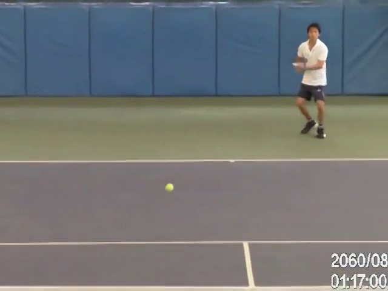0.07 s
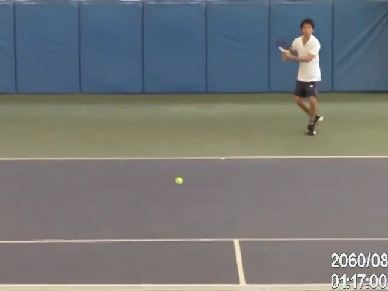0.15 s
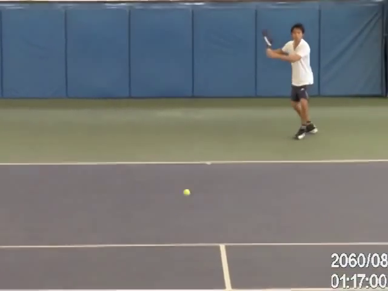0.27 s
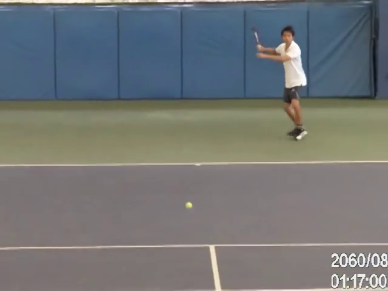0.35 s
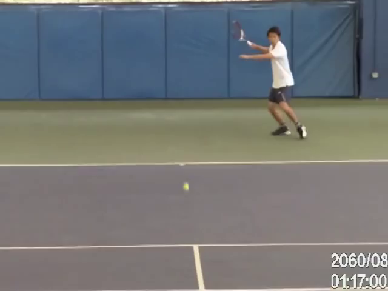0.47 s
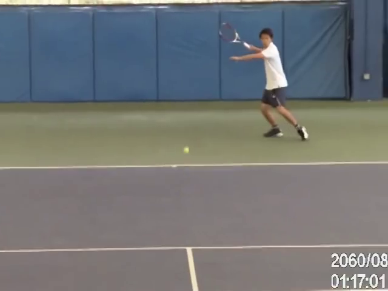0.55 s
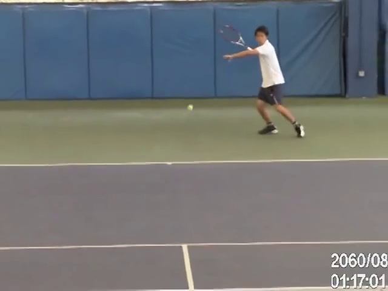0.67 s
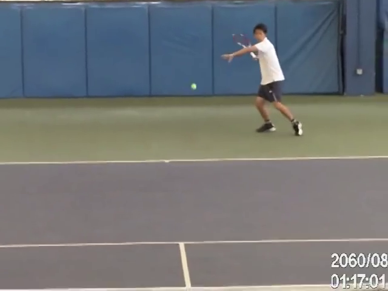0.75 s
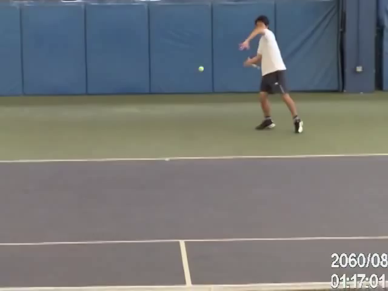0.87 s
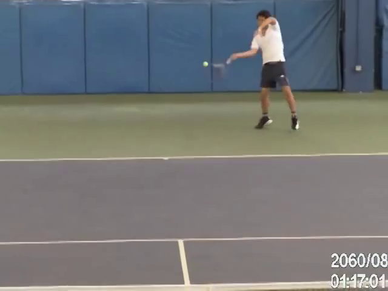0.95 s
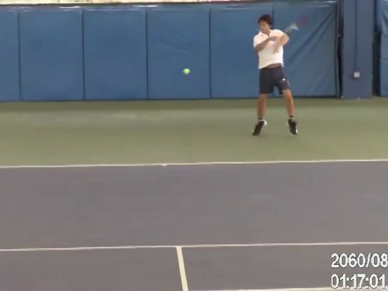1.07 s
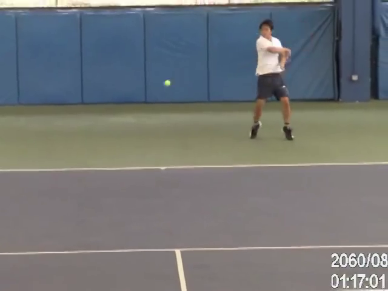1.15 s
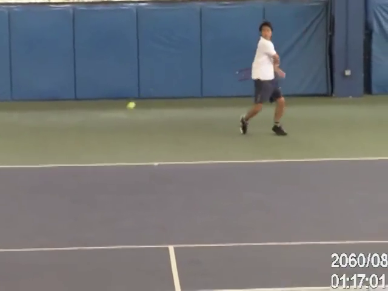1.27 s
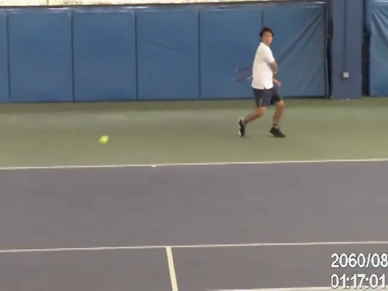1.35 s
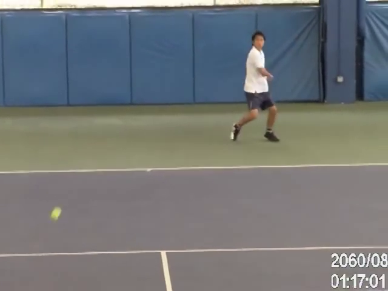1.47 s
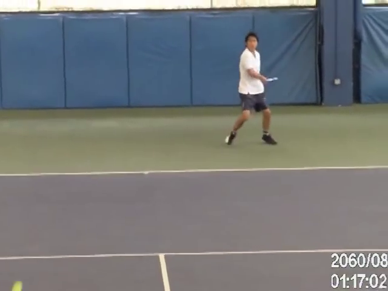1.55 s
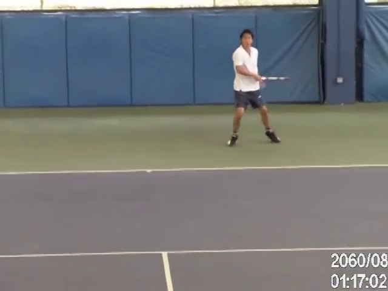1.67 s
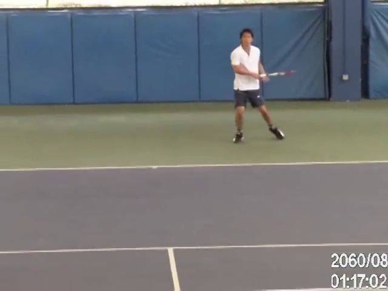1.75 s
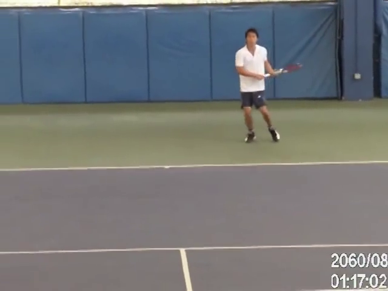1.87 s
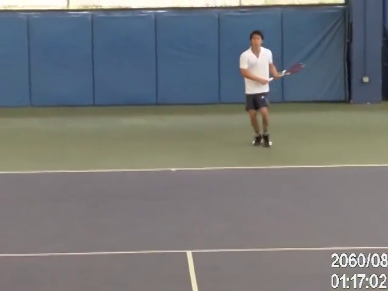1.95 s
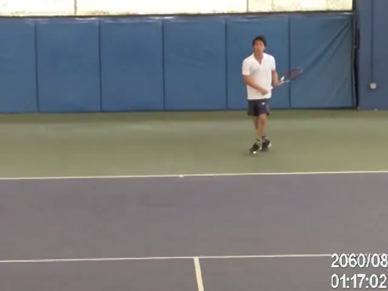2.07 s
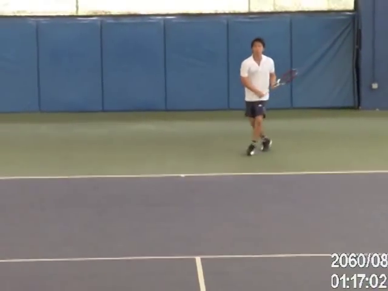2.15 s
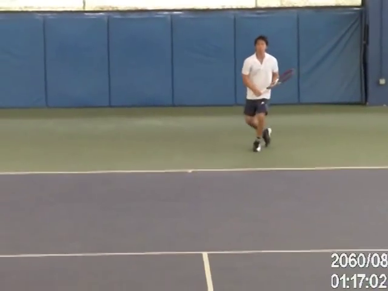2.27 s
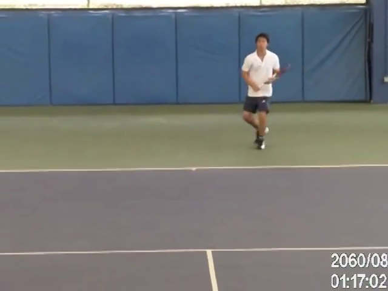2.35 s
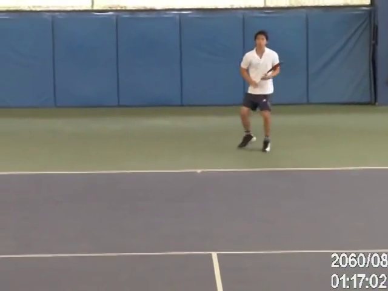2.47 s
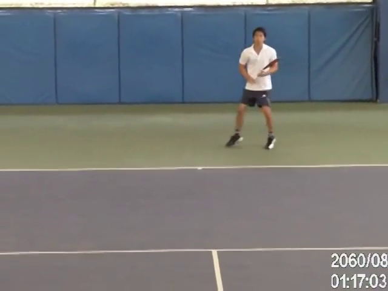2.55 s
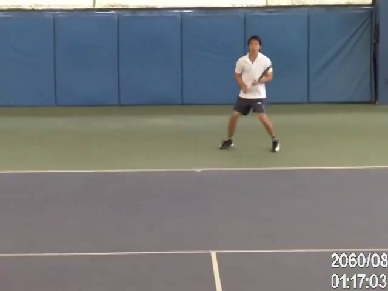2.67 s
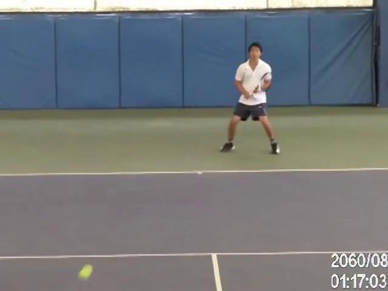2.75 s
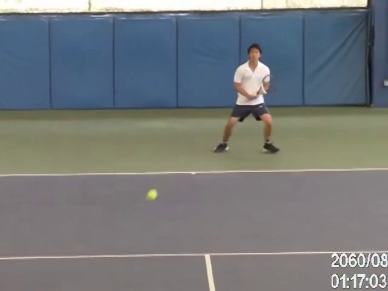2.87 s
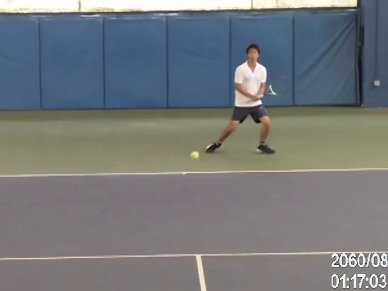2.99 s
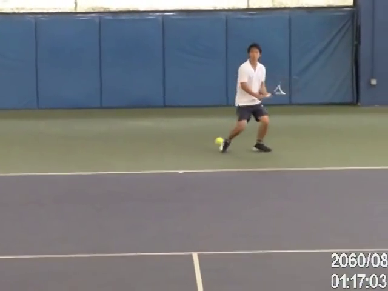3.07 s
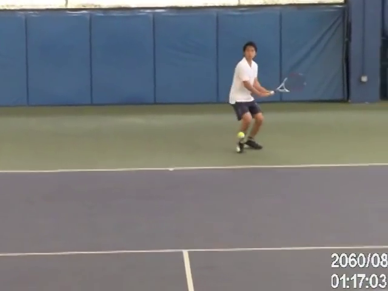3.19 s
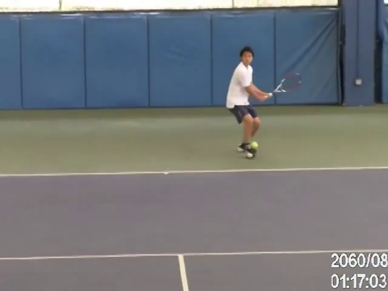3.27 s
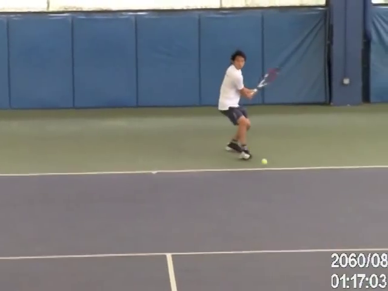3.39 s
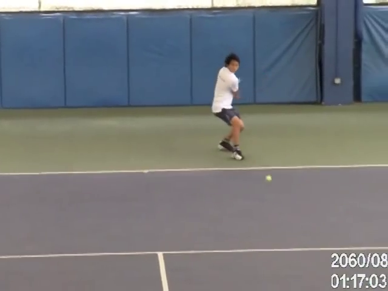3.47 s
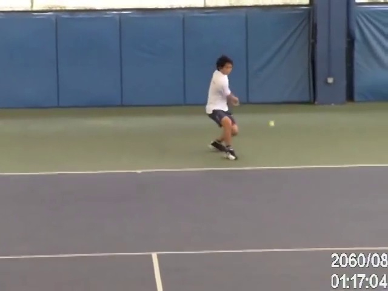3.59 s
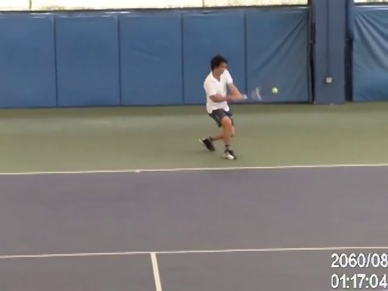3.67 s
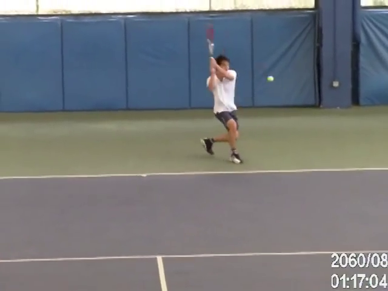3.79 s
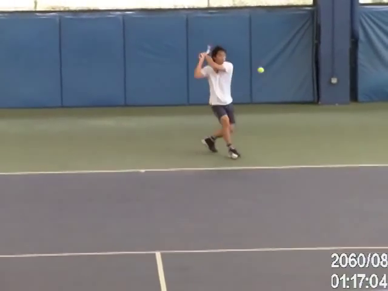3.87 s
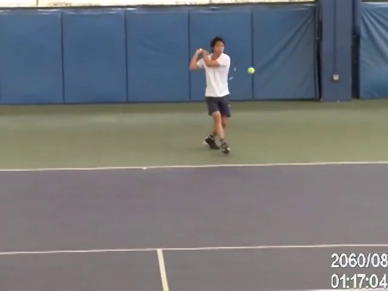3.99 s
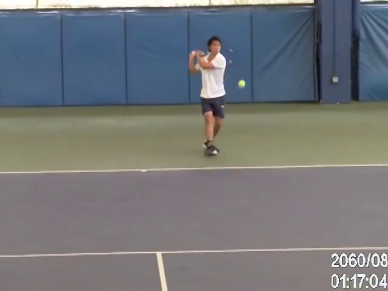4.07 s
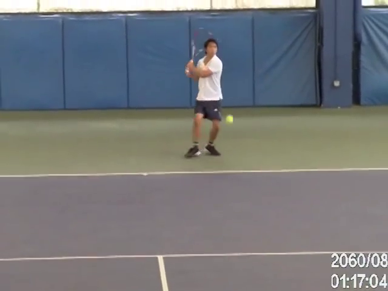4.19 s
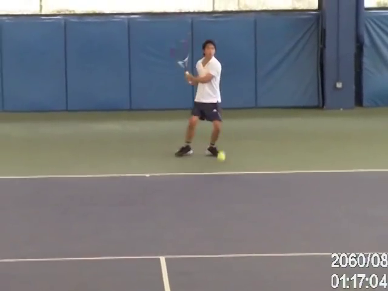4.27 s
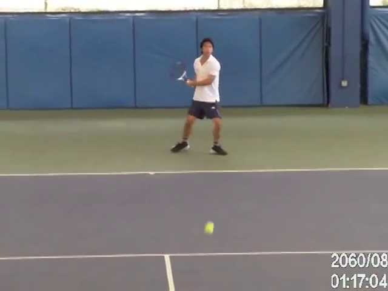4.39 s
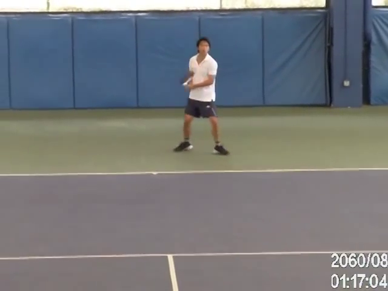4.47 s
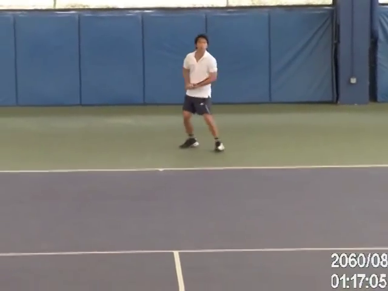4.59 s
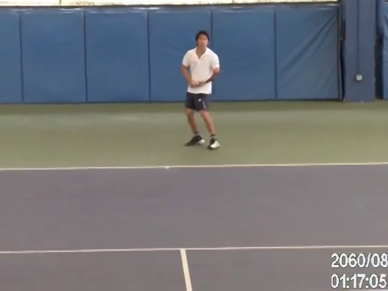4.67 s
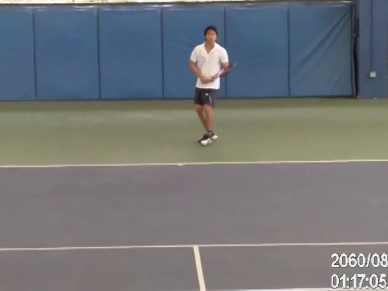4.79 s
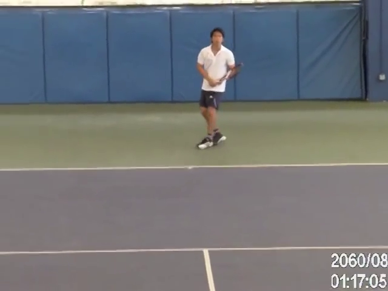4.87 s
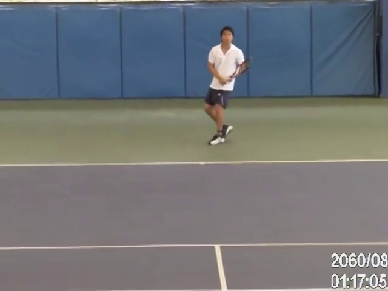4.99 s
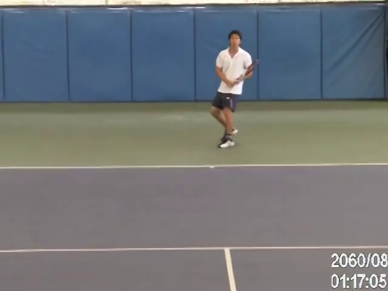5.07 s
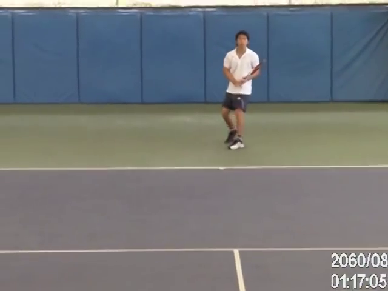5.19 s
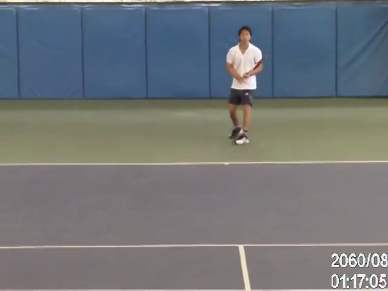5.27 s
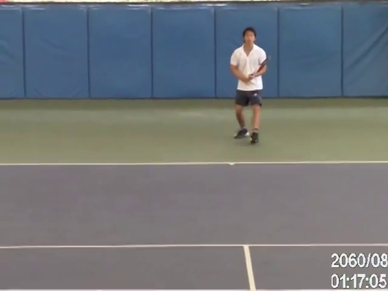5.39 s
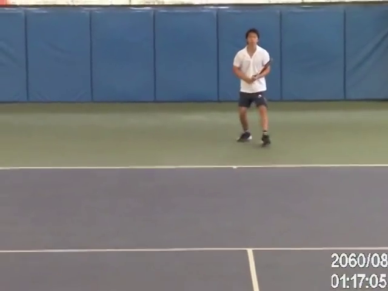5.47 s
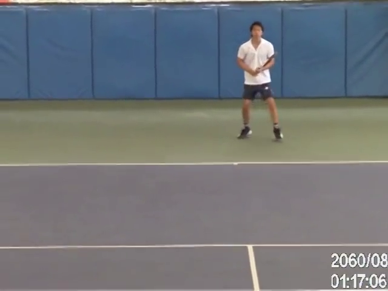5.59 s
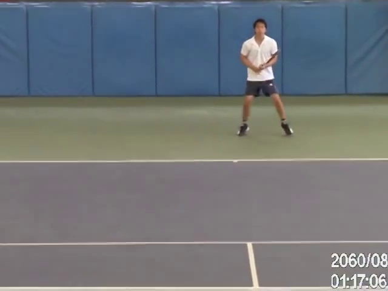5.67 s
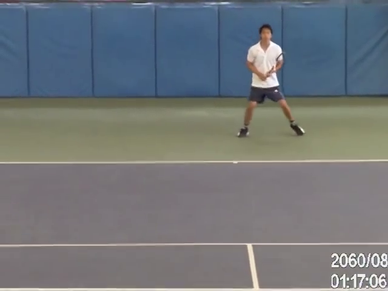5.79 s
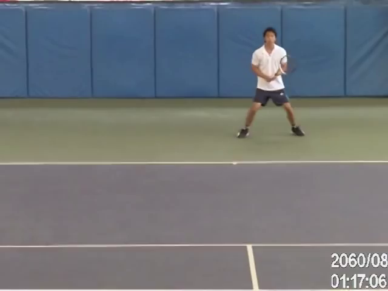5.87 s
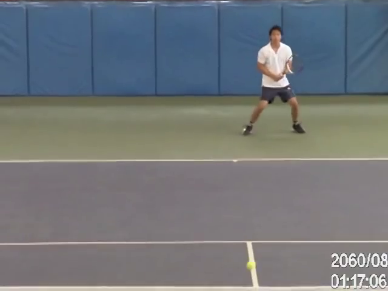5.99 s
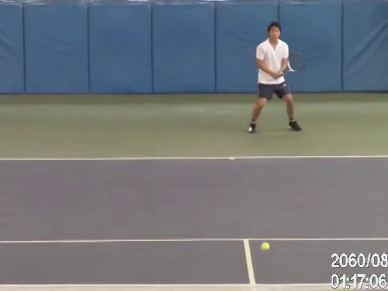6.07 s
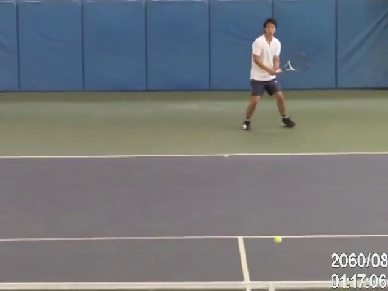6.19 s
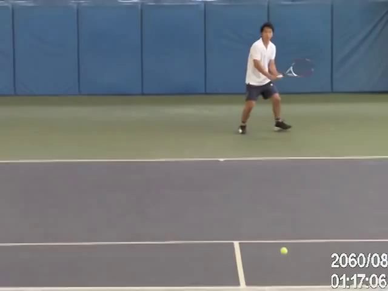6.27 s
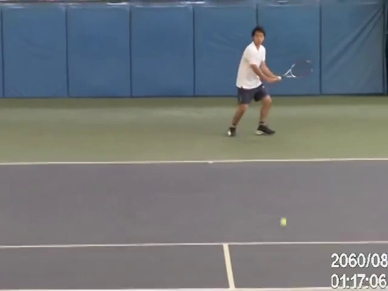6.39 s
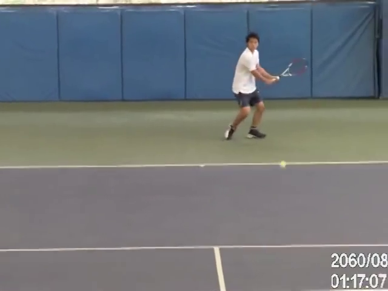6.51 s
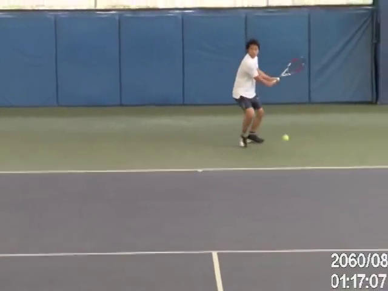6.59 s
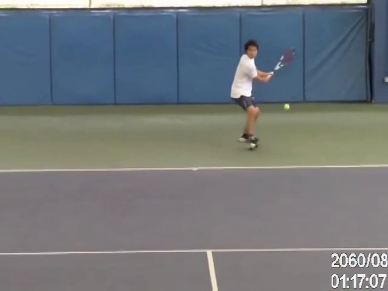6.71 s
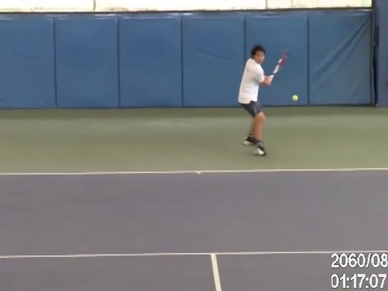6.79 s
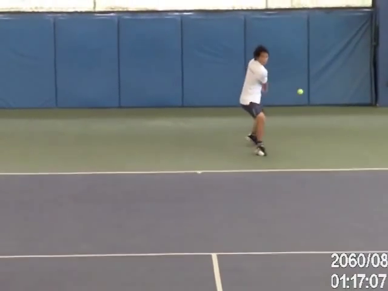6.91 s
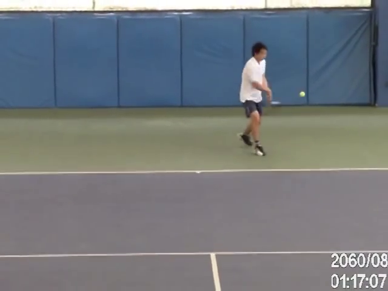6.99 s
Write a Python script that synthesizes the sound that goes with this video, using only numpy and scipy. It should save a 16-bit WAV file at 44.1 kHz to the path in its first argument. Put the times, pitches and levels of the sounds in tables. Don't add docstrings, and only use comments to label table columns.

```python
import sys
import numpy as np
from scipy import signal
from scipy.fft import rfft, irfft
from scipy.io import wavfile
from scipy.ndimage import uniform_filter1d

SR = 44100
rng = np.random.default_rng(int(sys.argv[2]) if len(sys.argv) > 2 else 0)


def nominal_scale(level):
    x = np.asarray(level, float) / 20
    return 10 ** x


def to_wav(sig):
    pcm = np.clip(np.atleast_2d(sig), -1, 1) * 32767
    pcm = np.round(pcm).astype(np.int16)
    wavfile.write(sys.argv[1], SR, pcm.T)


N = 310464

# (time [s], felt level [dB], frame level [dB], frame pitch [Hz], ball level [dB])
FAR_BLOWS = [
    (1.098, -17, -17, 2280, -6),
    (3.791, -20.5, -15, 2210, -11.5),
]
# (time [s], felt level [dB], frame level [dB], frame pitch [Hz], ball level [dB])
NEAR_BLOWS = [
    (2.4625, -12, -8.5, 4830, -3.5),
    (5.572, -4, -14.5, 2540, -8),
]


def evened(x):
    return x / np.sqrt(np.mean(x ** 2) + 1e-20)


def read(points, hz):
    f, value = np.transpose(points)
    return np.interp(np.log(hz + 1), np.log(f + 1), value)


def add(mix, s, sound):
    part = mix[:, round(s * SR):][:, :sound.shape[1]]
    part += sound[:, :part.shape[1]]


def colour(x, db_of):
    size = x.shape[-1]
    return irfft(rfft(x) * nominal_scale(db_of(np.fft.rfftfreq(size, 1 / SR))), size)


def panned(db, pan_db):
    return nominal_scale([[db + pan_db / 2], [db - pan_db / 2]])


def swell(t, build, t60):
    t = np.maximum(t, 0)
    return (1 - np.exp(-t / build)) * nominal_scale(-60 * t / t60)


def diffuse(gain, size):
    # (frequency [Hz], left-right correlation [-1..1])
    likeness = [(300, .998), (640, .99), (1410, .978), (3100, .86), (4800, .6), (6820, .05), (9000, -.3),
                (13000, -.55), (15000, -.2)]
    # (frequency [Hz], left over right [dB])
    balance = [(200, 0), (700, -.4), (4500, -.6), (9000, 1), (15000, .5)]
    hz = np.fft.rfftfreq(size, 1 / SR)[:, None]
    t = np.arange(4 * N // size + 4) * size / 4 / SR
    a, b, c, d = rng.standard_normal((len(t), len(hz), 4)).T
    same = np.clip(read(likeness, hz), -1, 1)
    left = a + 1j * b
    right = same * left + np.sqrt(1 - same ** 2) * (c + 1j * d)
    lean_db = read(balance, hz)
    spectra = np.array([left, right]) * nominal_scale([lean_db / 2, -lean_db / 2]) * gain(hz, t)
    return signal.istft(spectra, nperseg=size, noverlap=size - size // 4)[1][:, :N]


def crack(db, centre_hz, ms, pan_db):
    t = np.arange(2048) / SR

    def tint_db(hz):
        hump = -4.5 * np.log2((hz + 50) / centre_hz) ** 2
        snap = 5 / (1 + ((hz - 4600) / 700) ** 4)
        notch = 7 / (1 + ((hz - 6100) / 600) ** 4)
        return hump + snap - notch

    noise = rng.standard_normal((3, len(t)))
    noise = colour(0.75 * noise[0] + 0.49 * noise[1:], tint_db)
    burst = np.exp(-(t * 1000 / ms) ** 4)
    scatter = 0.3 * nominal_scale(-60 * t / 0.077)
    shape = (1 - np.exp(-t * 12000 / ms)) * (burst + scatter)
    return evened(noise) * shape * panned(db, pan_db)


def ring(db, hz, t60):
    t = np.arange(6144) / SR
    build_ms = 41 * t60
    build = 1 - np.exp(-(t * 1000 / build_ms) ** 2)
    return nominal_scale(db - 60 * t / t60) * np.sin(2 * np.pi * hz * t) * build * np.ones((2, 1))


def pitch(ball_db):
    return 1 + 0.01 * (ball_db + 4.5)


def blow(mix, row, paths, ball, felt_hz, felt_ms, frame_ms, snap_db, snap_lag):
    s, felt_db, frame_db, frame_hz, ball_db = row
    snap_t60 = 0.014
    for delay, felt_loss_db, frame_loss_db, ball_loss_db, pan_db in paths:
        arrival = s + delay
        smear_ms = min(130 * delay, 2.8)
        path_frame_db = frame_db + frame_loss_db
        add(mix, arrival, crack(felt_db + felt_loss_db, felt_hz, felt_ms + smear_ms, pan_db))
        add(mix, arrival, crack(path_frame_db, frame_hz, frame_ms + smear_ms, pan_db))
        for mode_db, ratio in ((0, 1), (-5, .86)):
            snap = ring(path_frame_db + snap_db + mode_db, ratio * frame_hz, snap_t60)
            add(mix, arrival + snap_lag, snap)
        for lag, db, hz, t60 in ball:
            note = ring(ball_db + ball_loss_db + db, hz * pitch(ball_db), t60)
            add(mix, arrival + lag + smear_ms / 1000, note)


def near_blows(mix):
    # (delay [s], felt [dB], frame [dB], ball [dB], left over right [dB])
    paths = [
        (0, -3.5, 0.5, -1.5, 1.8),
        (.0046, -6, -9, -11, -.5),
        (0.011, -16, -13, -9, .3),
        (.0205, -20, -30, -8.5, .4),
    ]
    # (lag [s], level [dB], pitch [Hz], t60 [s])
    ball = [(.0014, 3.5, 790, 0.025), (0.00362, 1.5, 1164, 0.017), (0.00497, -3.5, 697, 0.048),
            (.0018, -8.5, 317, 0.03)]
    for row in NEAR_BLOWS:
        blow(mix, row, paths, ball, felt_hz=9200, felt_ms=1.8, frame_ms=2.3, snap_db=1.5, snap_lag=.0001)


def far_blows(mix):
    # (delay [s], felt [dB], frame [dB], ball [dB], left over right [dB])
    paths = [
        (0, -0.5, -1.5, 2.5, -1),
        (.0122, -6, -7, -5, 2),
        (.027, -8, -16, -13, .4),
        (.0375, -4, -8.5, 0.5, .5),
    ]
    # (lag [s], level [dB], pitch [Hz], t60 [s])
    ball = [(.001, -1.5, 1033, 0.029), (.0034, -3, 825, 0.029)]
    for row in FAR_BLOWS:
        blow(mix, row, paths, ball, felt_hz=8550, felt_ms=4.4, frame_ms=4, snap_db=12, snap_lag=0.0021)


def knocks(mix):
    # (time [s], ring level [dB], pitch [Hz], t60 [s], crack level [dB])
    bounces = [(1.15, -14, 910, .057, -40), (2.515, -14, 788, 0.11, -40), (2.653, -9, 2520, 0.007, -25),
               (2.762, -13, 793, 0.054, -40), (3.823, -7, 1600, .012, -35), (3.861, -13, 794, 0.055, -40),
               (3.88, -30, 2300, .012, -29), (3.895, -32, 1100, .02, -27), (4.8803, -17, 1230, 0.019, -26),
               (5.5825, -11.5, 925, 0.11, -40), (5.7523, -25, 2370, .008, -24)]
    for s, db, hz, t60, crack_db in bounces:
        add(mix, s, ring(db, hz, t60))
        add(mix, s, crack(crack_db, 2.1 * hz, ms=3.2, pan_db=0))


def scuff(db, rise, t60, centre_hz, pan_db):
    t = np.arange(16384) / SR
    grains = rng.standard_normal((3, len(t))) * nominal_scale(rng.exponential(1, len(t)))
    grains = 0.21 * grains[0] * np.array([[1], [-.3]]) + 2.3 * grains[1:]
    grains = colour(grains, lambda hz: -9 * np.log2((hz + 50) / centre_hz) ** 2)
    onset = np.sin(np.pi / 2 * t / rise) ** 2
    stroke = np.where(t < rise, onset, nominal_scale(-60 * (t - rise) / t60))
    return evened(grains) * stroke * panned(db, pan_db)


def scuffs(mix):
    # (time [s], level [dB], t60 [s], centre frequency [Hz])
    steps = [(.31, -32.5, 0.31, 7000), (.89, -33, 0.29, 10100), (1.56, -31, .13, 11000),
             (1.852, -24, .16, 9550), (1.982, -22.5, 0.033, 8930), (2.599, -18, .21, 10700),
             (2.675, -23, 0.24, 9000), (2.972, -27.5, .24, 10050), (3.425, -28, 0.5, 7160),
             (3.58, -21, .23, 11650), (4.606, -20, 0.25, 12400), (4.787, -24, .28, 10800),
             (4.85, -30.5, 0.92, 10700), (5.741, -17.5, .22, 11600), (6.006, -24, 0.11, 9200),
             (6.86, -34, .3, 9000)]
    for s, db, t60, hz in steps:
        rise = min(0.077 * t60, 0.035)
        add(mix, s, scuff(db, rise, t60, hz, pan_db=1.2))


def hall():
    # (time [s], level [dB], build-up [s], treble tilt [dB per octave], decay time factor)
    waves = [(-.3, -18.5, .02, 2.5, 0.85), (1.103, -19.5, 0.0043, 2, 2.4), (1.105, -10, 0.022, -6, 0.55),
             (1.175, -24, 0.019, 6, 0.23), (2.475, -17.5, 0.0092, 1, 1.5), (2.6, -22.5, 0.052, 5, 0.74),
             (2.635, -20, 0.035, 5, 0.16), (3.797, -16.5, 0.026, 1.7, 1.05), (3.8, -19.5, 0.036, 3.5, 0.19),
             (5.58, -21, 0.0076, 2, 1.65), (5.72, -26.5, 0.027, 4, 0.87)]
    # (frequency [Hz], level [dB])
    tint = [(70, -58), (150, -64), (300, -12), (550, -6.5), (1100, -7), (1600, -7), (3000, -13),
            (5000, -13.5), (5800, -16.5), (9000, -16.5), (15000, -25.5)]
    # (frequency [Hz], t60 [s])
    decay = [(200, 1.9), (800, 6.26), (2500, 5.3), (6000, 1.8), (12000, 1.24)]

    def gain(hz, t):
        power = 0
        for s, db, build, tilt_db, slow in waves:
            wave = swell(t - s, build, slow * read(decay, hz))
            power = power + (wave * nominal_scale(db + tilt_db * np.log2(1 + hz / 1000))) ** 2
        flutter = evened(uniform_filter1d(rng.standard_normal(len(t)), size=3))
        return np.sqrt(power) * nominal_scale(read(tint, hz) + 1.65 * flutter)

    return nominal_scale(-16) * diffuse(gain, size=512)


def hanging():
    # (delay [s], level [dB], build-up [s], pitch [Hz], t60 [s])
    far_notes = [(0.021, -20, 0.017, 788, 3.9), (0.015, -27, .012, 970, 1.7),
                 (0.022, -26.5, 0.023, 1500, 0.77)]
    # (delay [s], level [dB], build-up [s], pitch [Hz], t60 [s])
    near_notes = [(.015, -21.5, .009, 755, 0.57), (.03, -24, 0.018, 1030, 0.63), (.2, -25, .058, 790, 2.1),
                  (0.201, -30.5, .056, 990, 2.6)]
    # (time [s], level [dB], pitch [Hz], t60 [s])
    courts = [(-.2, -31, 776, 3.3), (2.33, -32, 1020, 1.5), (3.2, -33, 794, 0.99), (4.12, -38, 798, 1.8),
              (5.37, -27, 992, 1.4), (6.02, -36, 1090, 0.95), (6.08, -38, 813, 1.8)]
    rows = []
    for blows, tails in ((FAR_BLOWS, far_notes), (NEAR_BLOWS, near_notes)):
        for s, *_, ball_db in blows:
            force_db = .85 * (ball_db + 4.5)
            stiffer = pitch(ball_db) ** .4
            for delay, db, build, hz, t60 in tails:
                rows.append((s + delay, db + force_db, build, hz * stiffer, 115, t60))
    for s, db, hz, t60 in courts:
        rows.append((s, db, 0.048, hz, 90, t60))
    return rows


def notes():
    t = np.arange(N) / SR
    echoes = diffuse(lambda hz, t: 1, size=512)
    out = np.zeros_like(echoes)
    for s, db, build, note_hz, width, t60 in hanging():
        width = max(width, 125 if note_hz < 900 else 50)
        band = colour(echoes, lambda hz: -20 * np.log10(1 + (2 * (hz - note_hz) / width) ** 2))
        out += nominal_scale(db) * swell(t - s, build, t60) * evened(band)
    return out


def fans():
    # (frequency [Hz], density [dB per Hz])
    hiss_tint = [(25, -37), (110, -43.5), (185, -28), (260, -18), (400, -18.5), (500, -7.5), (680, -4.5),
                 (990, 0.5), (1790, -5.5), (2550, -4), (4500, -7.5), (5900, -12.5), (10000, -12),
                 (15500, -17.5)]
    # (pitch [Hz], level [dB])
    whines = [(2655, -46), (2607, -51), (2515, -52), (3008, -53), (3294, -52), (3517, -54), (3738, -55)]

    def gain(hz, t):
        patches = rng.standard_normal((len(t), len(hz)))
        patches = uniform_filter1d(patches, size=12, axis=0)
        patches = uniform_filter1d(patches, size=14, axis=1)
        duct_db = 4 / (1 + ((hz - 2590) / 110) ** 2)
        return nominal_scale(read(hiss_tint, hz) + evened(patches).T + duct_db)

    hiss = nominal_scale(-26.27) * evened(diffuse(gain, size=1024))
    for hz, db in whines:
        drift = rng.standard_normal(60)
        waver = evened(np.interp(np.arange(N), np.linspace(0, N, num=60), drift))
        phase = 2 * np.pi * np.cumsum(hz + 4.5 * waver) / SR
        hiss = hiss + nominal_scale(db + 3 + 2.5 * waver) * np.sin(phase)
    return hiss


def scene():
    play = hall() + notes()
    near_blows(play)
    far_blows(play)
    knocks(play)
    scuffs(play)
    return fans() + colour(play, lambda hz: -10 * np.log10(1 + (170 / (hz + 15)) ** 6))


def limiter(dry):
    power = uniform_filter1d((dry ** 2).mean(0), size=132, origin=65)
    power_db = 10 * np.log10(abs(power) + 1e-12)
    fall = np.arange(N) * 36.0 / SR
    held_db = np.maximum.accumulate(power_db + fall) - fall
    over_db = np.maximum(held_db + 12.0, 0)
    return dry / nominal_scale(.55 * uniform_filter1d(over_db, size=176, origin=87))


def top_cut(x):
    return signal.sosfilt(signal.butter(12, 16510, fs=SR, output="sos"), x)


def record(dry):
    # (time [s], level [dB])
    jolts = [
        (1.1, -62),
        (2.462, -64),
        (3.793, -70),
        (5.572, -47),
    ]

    def band_db(hz):
        top_db = np.interp(hz - 15330, [0, 120, 1100, 1300], [0, -40, -52, -85])
        return top_db - 10 * np.log10(1 + (90 / (hz + 25)) ** 4)

    mix = colour(np.tanh(1.107 * limiter(dry)) / 1.044, band_db)
    for s, db in jolts:
        add(mix, s, nominal_scale(db) * np.hanning(260) * np.ones((2, 1)))
    return top_cut(mix)


dry = scene()
out = record(dry)
to_wav(out)
```